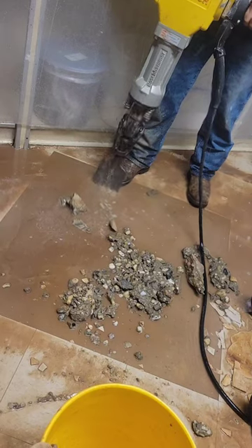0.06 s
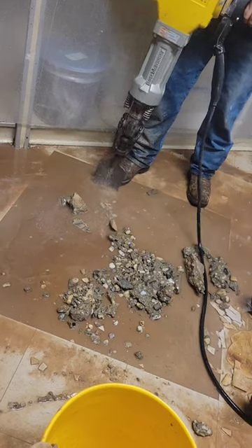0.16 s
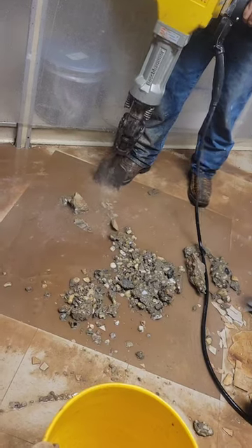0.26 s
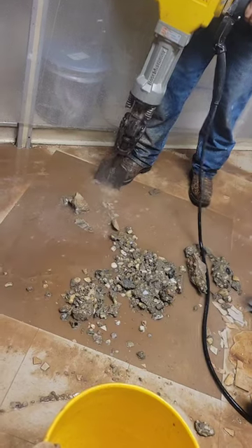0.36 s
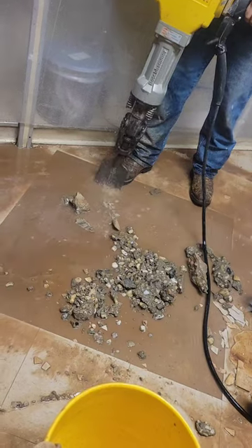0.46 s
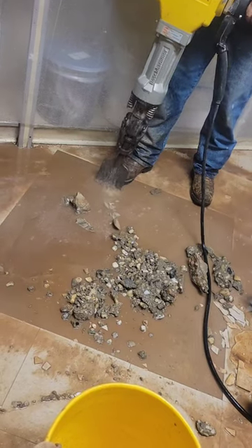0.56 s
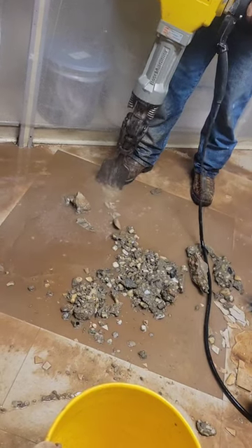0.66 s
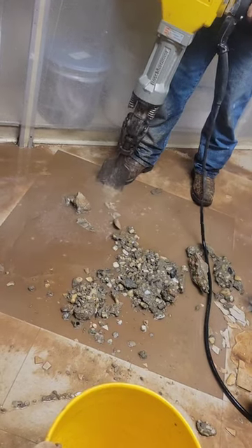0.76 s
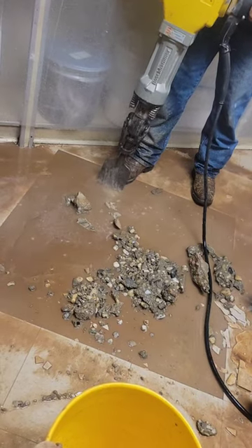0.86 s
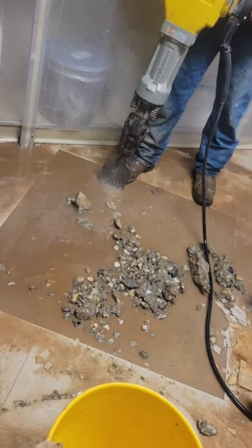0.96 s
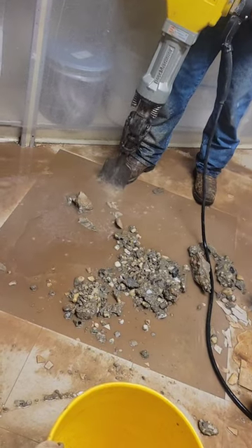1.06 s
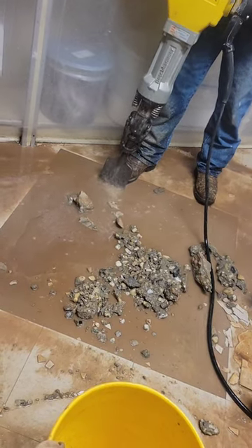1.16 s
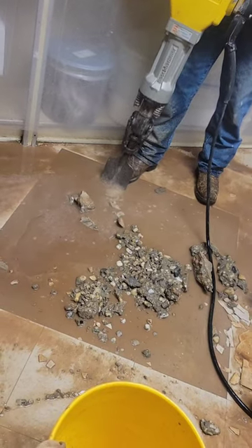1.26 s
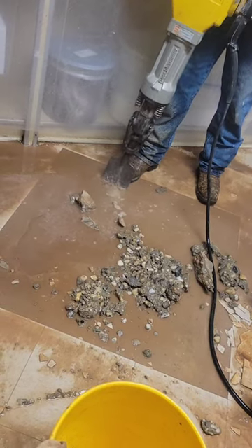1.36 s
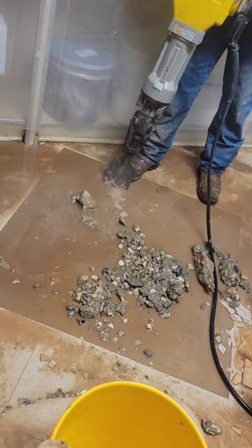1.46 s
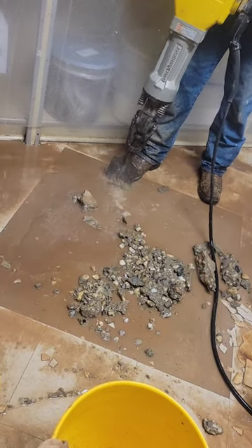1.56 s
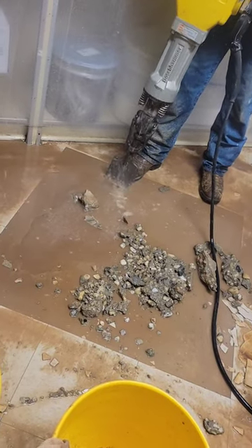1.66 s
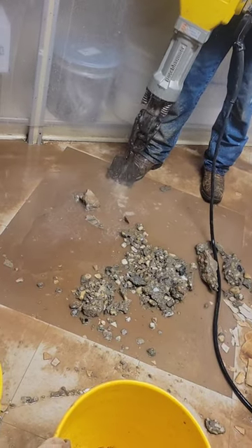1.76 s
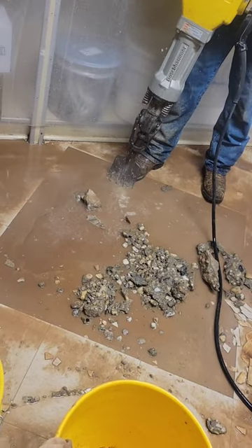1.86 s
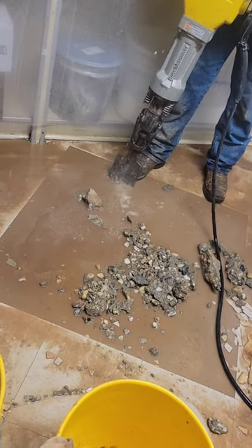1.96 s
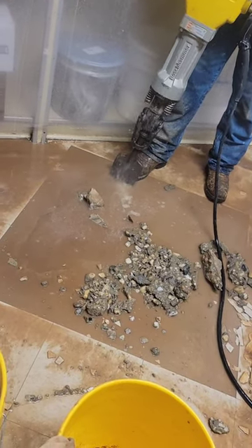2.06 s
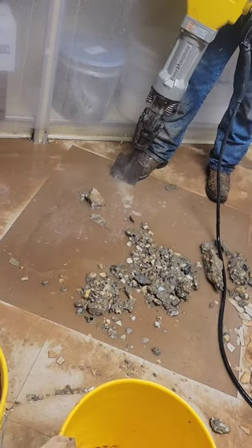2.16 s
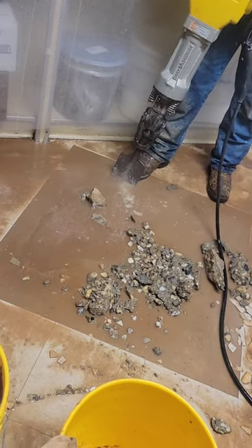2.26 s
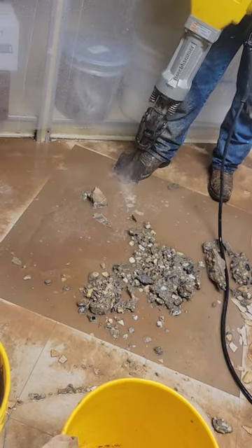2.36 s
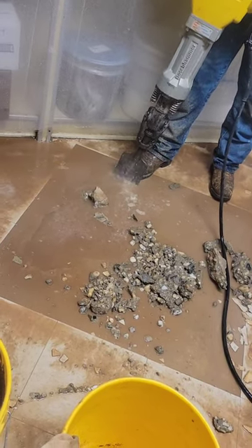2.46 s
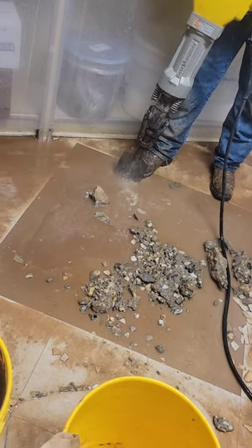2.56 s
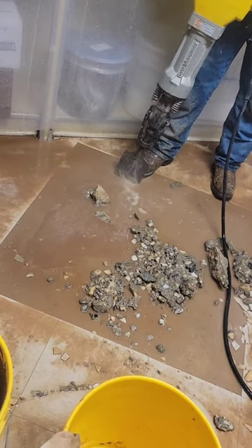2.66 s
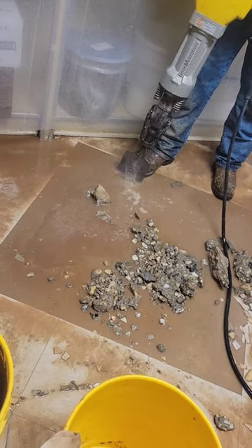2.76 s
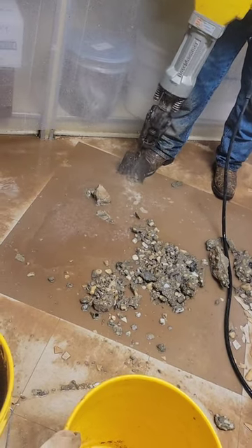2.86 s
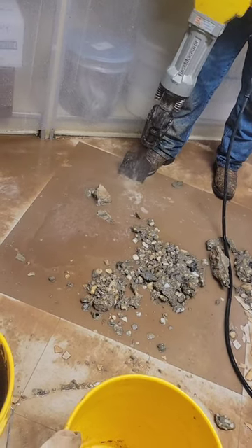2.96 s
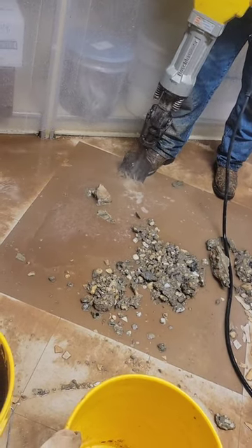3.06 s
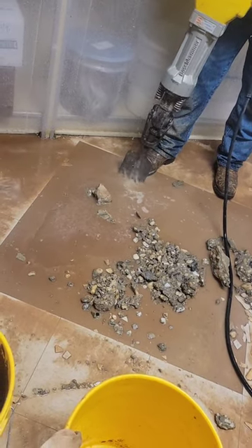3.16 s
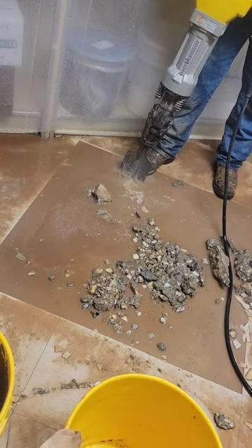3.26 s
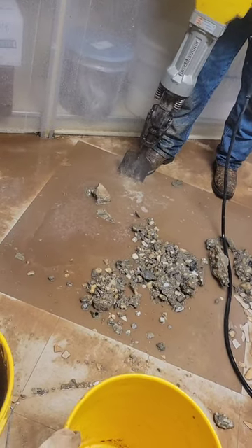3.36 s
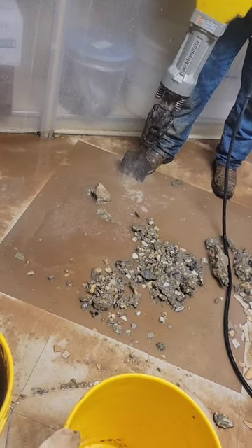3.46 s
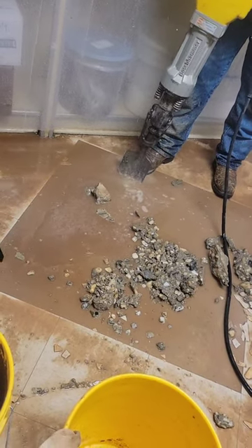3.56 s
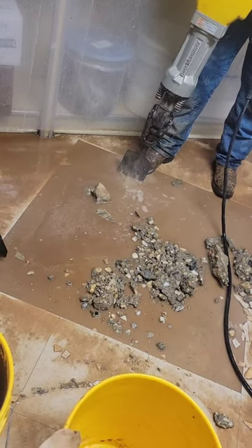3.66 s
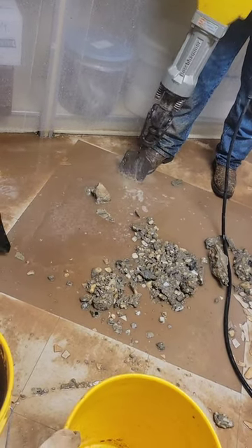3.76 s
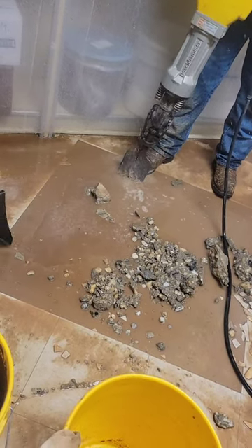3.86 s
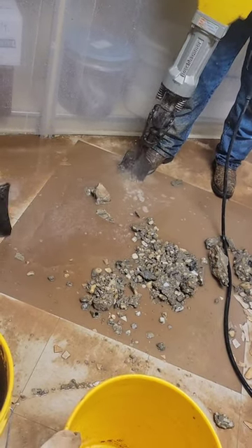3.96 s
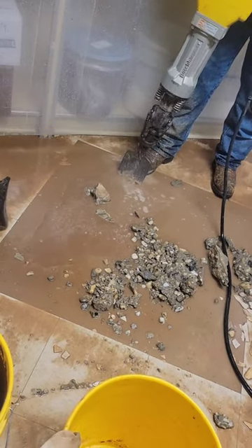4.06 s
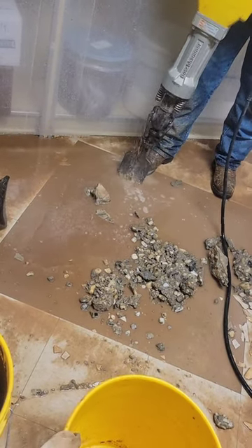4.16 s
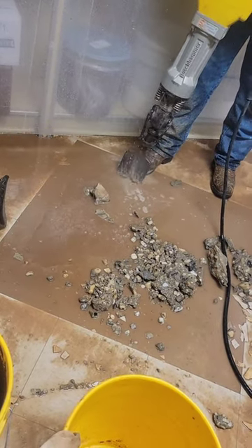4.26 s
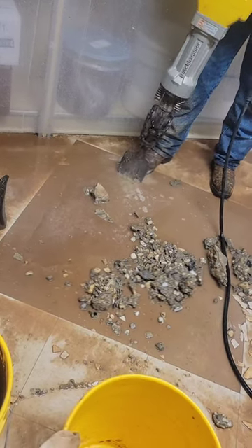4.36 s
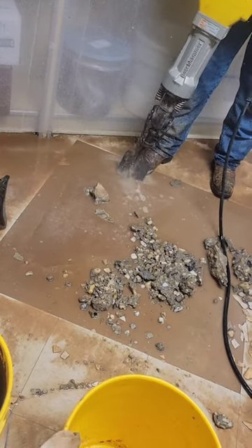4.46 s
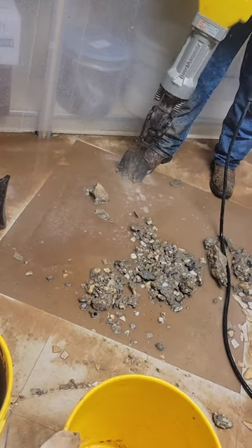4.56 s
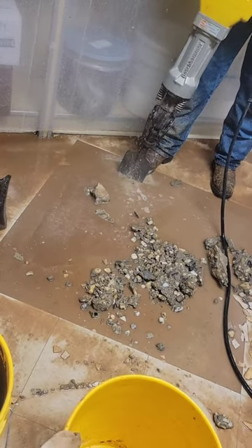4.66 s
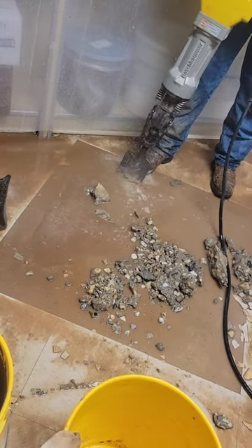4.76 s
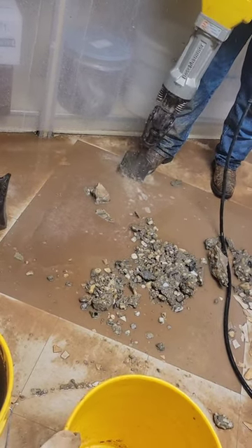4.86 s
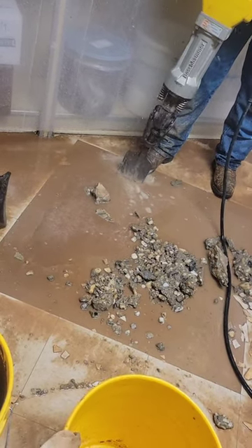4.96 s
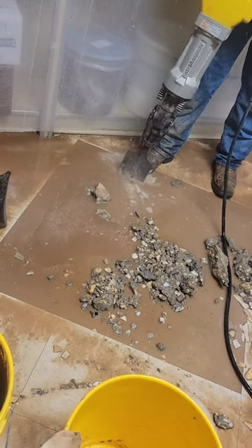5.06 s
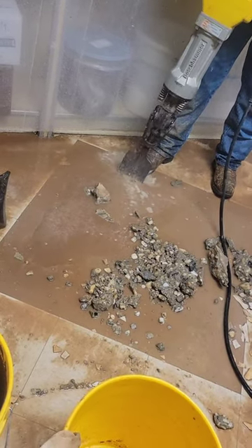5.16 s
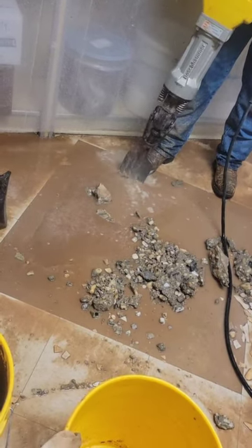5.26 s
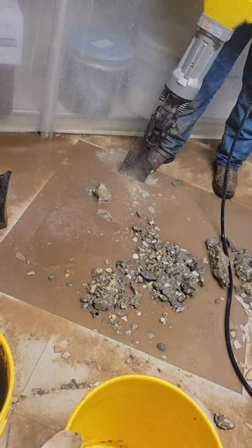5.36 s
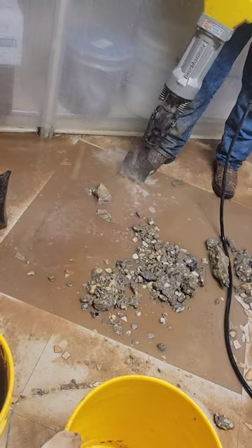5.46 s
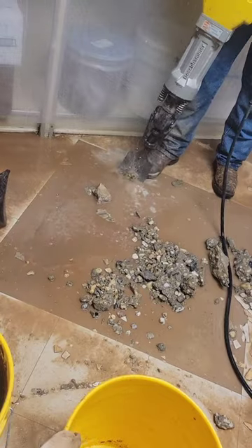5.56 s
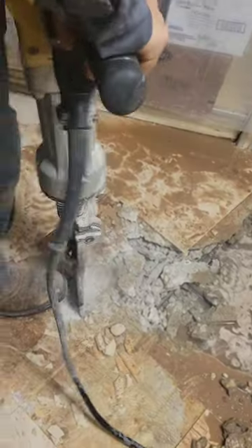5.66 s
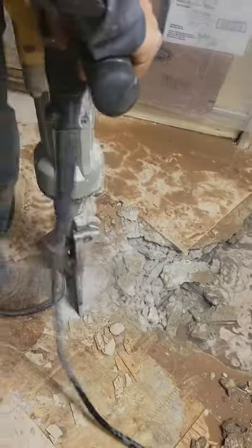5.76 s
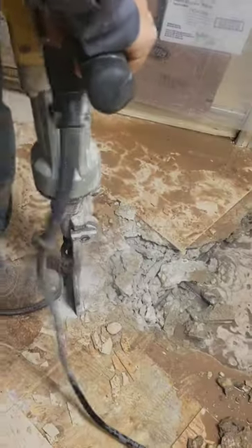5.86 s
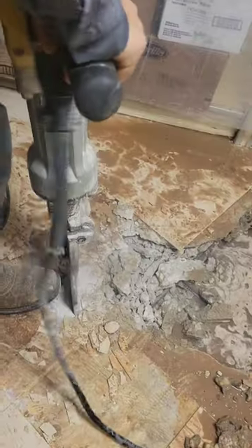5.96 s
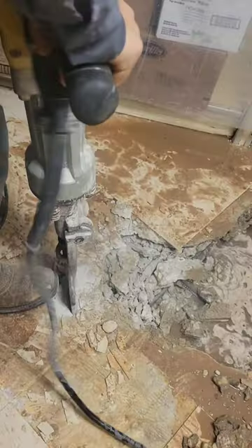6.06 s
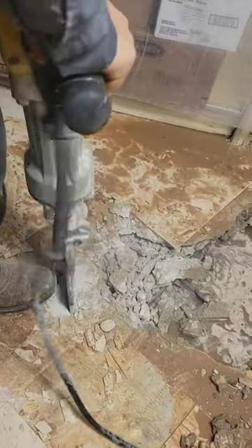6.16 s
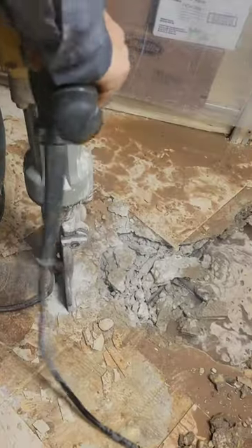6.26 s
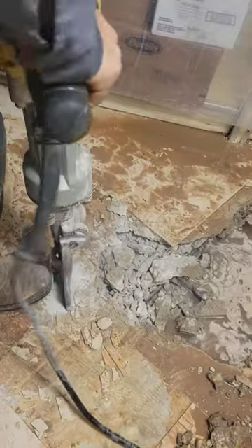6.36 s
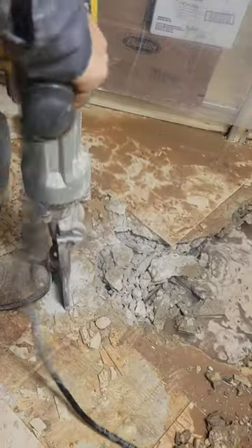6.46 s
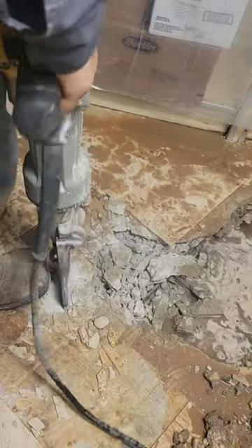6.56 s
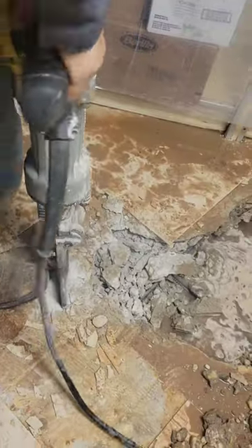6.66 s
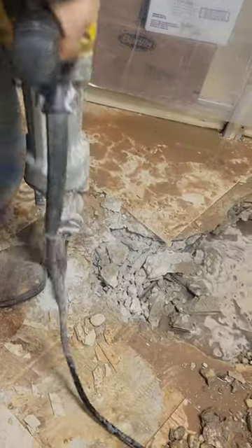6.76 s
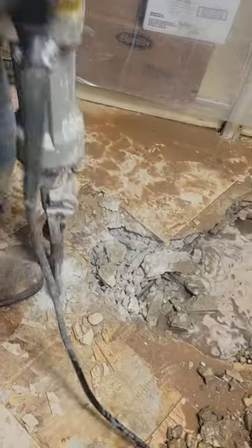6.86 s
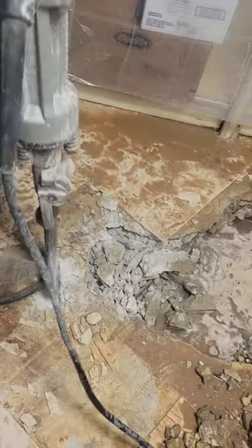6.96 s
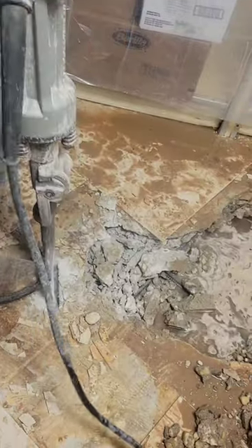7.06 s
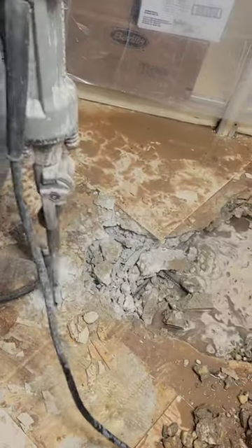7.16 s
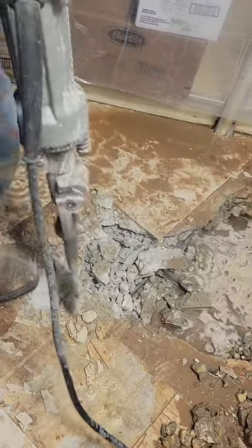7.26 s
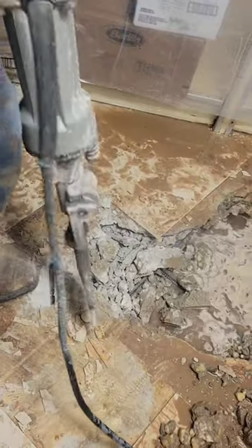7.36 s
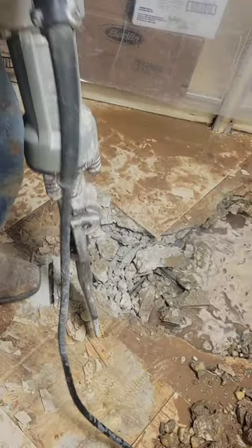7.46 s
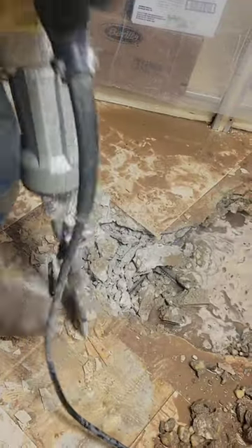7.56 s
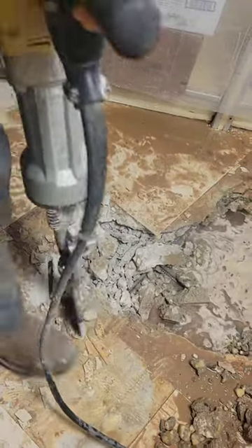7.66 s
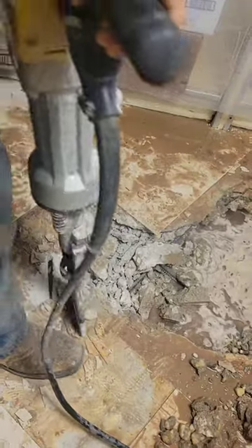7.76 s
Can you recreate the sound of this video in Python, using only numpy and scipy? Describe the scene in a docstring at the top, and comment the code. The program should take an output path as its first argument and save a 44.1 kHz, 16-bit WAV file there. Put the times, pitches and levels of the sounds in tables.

```python
"""An electric demolition hammer is pounding a concrete floor in a small hard room, over a faint rush of air.
Every blow thuds through the floor, crushes concrete with a bright crack and sets the steel chisel ringing.
After a brief silence it is at a second spot, over a low hum, where the drive squeaks and runs down.
The lifted chisel rings on, clinks and scrapes lightly over the fragments,
then knocks down on the floor and is shoved through the rubble."""
import sys
import numpy as np
from scipy import signal
from scipy.fft import rfft, irfft
from scipy.io import wavfile

SR = 44100
rng = np.random.default_rng(int(sys.argv[2]) if len(sys.argv) > 2 else 0)


def transcribe(signal):
    """Save signal, clipped to [-1, 1], as a 16-bit WAV file at the path in sys.argv[1]."""
    frames = np.atleast_2d(signal).T
    limited = np.clip(frames, -1, 1)
    pcm = np.round(limited * 32767).astype(np.int16)
    wavfile.write(sys.argv[1], SR, pcm)


N = 345303
TIME = np.arange(N) / SR
AGE = np.arange(16384) / SR   # seconds into a single hit
SECOND_SPOT_S, SET_DOWN_S = 5.8, 7.609

# The first crack of steel on stone. Each row: frequency in Hz, noise density in dB.
CRACK_SPECTRUM = [(100, -56), (600, -52), (2000, -61.5), (3500, -67), (5700, -47.5), (7500, -59),
                  (15000, -71)]
# The chisel's modes. Each row: pitch in Hz, then level in dB at the first spot, at the second spot,
# once sunk in there and when lifted, then left over right in dB.
CHISEL_MODES = [(1499.2, -33, -39, -34, -55, -1.5), (2872, -34, -42, -42, -39, 6),
                (2986, -38.5, -36, -33, -28, -1.5), (3139, -30, -41, -36.5, -24.5, 2.5),
                (4144, -32, -49, -45, -15.5, 0.5), (4755, -29, -34, -28.5, -47, -11),
                (4850, -25.5, -42, -36, -21, 1), (5527, -30, -19, -26.5, -18, -10.5),
                (5670, -38, -25.5, -31, -40, 10), (5974, -27, -45, -45, -18, -3.5),
                (6980, -38, -42, -42, -48, 0.5), (7150, -35, -38, -34, -25, 14.5),
                (7990, -35.5, -38, -20, -42, 1.5), (9450, -39, -50, -48, -33, 8),
                (11540, -30, -20.5, -28, -33, 4.5), (11640, -35, -31, -33, -45, 5),
                (11890, -28.5, -48, -40, -35, -2.5), (14630, -26.5, -35, -36, -26, -3),
                (15520, -41, -48, -48, -48, 2)]


def from_db(db):
    return 10 ** (np.asarray(db) / 20)


def unit_rms(x):
    return x / np.sqrt(np.mean(x ** 2) + 1e-20)


def at_hz(points, hz):
    """Read a curve along a logarithmic frequency axis."""
    knots, values = np.transpose(points)
    return np.interp(np.log(hz + 1), np.log(knots), values)


def pan(left_over_right_db):
    return from_db(np.array([[.5], [-.5]]) * left_over_right_db)


def butter(x, order, hz, kind="low"):
    return signal.sosfilt(signal.butter(order, hz, kind, fs=SR, output="sos"), x)


def add(out, s, sound):
    """Mix a sound in from time s on."""
    start = max(round(s * SR), 0)
    out[..., start:start + sound.shape[-1]] += sound[..., :N - start]


def ring(drive, hz, t60):
    """One resonance: a unit click sets a sine of height 1 ringing."""
    radius, angle = from_db(-60 / (t60 * SR)), 2 * np.pi * hz / SR
    return signal.lfilter([0, np.sin(angle)], [1, -2 * radius * np.cos(angle), radius ** 2], drive + 1e-18)


def room_noise(spectrum, size, count=1):
    """A stack of stereo noises with the given spectrum, spread as the room spreads them."""
    # Stereo width. Each row: frequency in Hz, likeness of left and right (1 or more is fully alike).
    likeness = [(60, 0.07), (200, 1.3), (350, 0.24), (640, -0.14), (1400, -0.35), (3000, 0.06),
                (6000, -0.21), (15000, 0)]
    # Stereo lean. Each row: frequency in Hz, left over right in dB.
    balance = [(300, 2), (600, -4.5), (1400, -2), (2500, 0.5), (4400, -2.5), (6000, -4), (7500, -0.5),
               (11000, 5), (12500, -1), (15000, 5.5)]
    hz = np.arange(size // 2 + 1) * SR / size
    mid, side = rfft(rng.standard_normal((2, count, 1, size)))
    alike = np.clip(at_hz(likeness, hz), -1, 1)
    stereo = np.sqrt((1 + alike) / 2) * mid + np.sqrt((1 - alike) / 2) * side * [[1], [-1]]
    return irfft(stereo * from_db(at_hz(spectrum, hz)) * pan(at_hz(balance, hz)), size) * np.sqrt(SR / 2)


def linger(hold_s, t60, rise_s):
    """A blow's level holds for a moment, then dies away."""
    return (1 - np.exp(-AGE / rise_s)) / np.sqrt(1 + from_db(120 * (AGE - hold_s) / t60))


def grit(per_s, spread_db):
    """Gain that jumps from fragment to fragment."""
    knots = np.cumsum(rng.exponential(1 / per_s, 20000))
    jumps = np.clip(rng.standard_normal(len(knots)), -2, 2)
    return unit_rms(from_db(spread_db * np.interp(TIME, knots, jumps)))


def long_run(start_s, end_s):
    """One blow per turn of the crank. Each row: seconds, then thud, crunch, lower and upper ring in dB."""
    # The motor sags a little halfway. Each row: time in seconds, blows per second.
    blow_rate = [(2.9, 14.15), (3.0, 14.105)]
    # How the tool bears on the floor. Each row: time in seconds, then level in dB of the thud,
    # the crunch, the chisel's lower modes and its upper modes.
    bearing = [(.2, -5.5, 5.5, 2, 2.5), (.8, -3.5, 2, -1.5, 2), (1.5, -4.5, 3, 0, -2.5),
               (2.3, -2.5, 2.4, -0.5, 1), (3.7, -3.5, 2.4, -1, 2), (4.2, -3, 4, -2.5, 1.5),
               (5.65, -3.5, 3, -2, 0.5)]
    working = TIME[(TIME >= start_s) & (TIME < end_s)]
    turns = np.cumsum(np.interp(working, *np.transpose(blow_rate))) / SR
    starts = np.interp(np.arange(int(turns[-1]) + 1), turns, working)
    knots, *curves = np.transpose(bearing)
    levels = np.transpose([np.interp(starts, knots, db) for db in curves])
    luck = np.clip(rng.standard_normal((len(starts) + 1, 4)), -2, 2)
    slip_s = .0006 * luck[1:, 0]   # the striker lands a little early or late
    # after a hard bounce the chisel tends to sit badly for the next blow
    rebound_share, scatter_db = 0.47, [0, 0.73, 1.2, 2]
    scatter = (luck[1:] - rebound_share * luck[:-1]) * scatter_db
    return np.column_stack([starts + slip_s, levels + scatter])


def thud(blows, jolts, modes, level_db, uneven_db, right_lag_s):
    """Blow and recoil shake the floor in nearly the same way on every stroke."""
    clicks = np.zeros(N)
    for (s, thud_db, *_), lucks in zip(blows, rng.standard_normal((len(blows), len(jolts)))):
        for (delay, db), luck in zip(jolts, lucks):
            add(clicks, s + delay, from_db([thud_db + db + uneven_db * luck]))
    boom = sum((-1) ** k * from_db(db) * ring(clicks, hz, t60) for k, (hz, db, t60) in enumerate(modes))
    return from_db(level_db) * np.array([boom, np.interp(TIME - right_lag_s, TIME, boom)])


def fragment_colour(bursts, ripple_db, width_hz):
    """Every fragment that breaks off stresses other pitches."""
    hz = np.arange(len(AGE) // 2 + 1) * SR / len(AGE)
    knots = np.arange(0, SR / 2, width_hz)
    ripples = np.clip(rng.standard_normal((len(knots), len(bursts))), -2, 2).T
    gains = np.array([unit_rms(from_db(ripple_db * np.interp(hz, knots, row))) for row in ripples])
    return irfft(rfft(bursts) * gains[:, None], len(AGE))


def crunch(blows, spectrum, envelope, crossover_hz, grit_db):
    """The casing's low clatter repeats on every blow; the crushed concrete above it is new each time."""
    same, *fresh = room_noise(spectrum, size=len(AGE), count=len(blows) + 1)
    fresh = fragment_colour(np.array(fresh), ripple_db=4.0, width_hz=70)
    clatter = butter(same, 1, crossover_hz)
    crushes = butter(fresh, 1, crossover_hz, "high")
    out = np.zeros((2, N))
    for (s, _, db, *_), crush in zip(blows, crushes):
        add(out, s, from_db(db - np.median(blows[:, 2])) * envelope * (clatter + crush))
    return out * grit(per_s=900, spread_db=grit_db)


def crack(blows, level_db, t60):
    """The tip meets stone with a short bright crack that follows the level of the lower ring."""
    bursts = room_noise(CRACK_SPECTRUM, size=len(AGE), count=len(blows))
    out = np.zeros((2, N))
    for (s, _, _, lower_db, _), burst in zip(blows, bursts):
        add(out, s, burst * from_db(level_db + lower_db - 60 * AGE / t60))
    return out


def chisel(blows, t60, uneven_db, lower_db, upper_db, strike_gain):
    """Each blow strikes the steel, which then chatters in its holder; the modes share it out unevenly."""
    sunk_s, lifted_s, upper_from_hz = 6.4, 6.9, 7500
    stance = np.searchsorted([SECOND_SPOT_S, sunk_s, lifted_s], blows[:, 0])
    lower = linger(hold_s=0.023, t60=0.23, rise_s=0.00018), blows[:, 3] + lower_db
    upper = linger(hold_s=0.038, t60=0.22, rise_s=0.0014), blows[:, 4] + upper_db
    build_up = np.sqrt(t60 * SR / np.log(1000)) / 2   # a mode's gain under steady chatter
    out = np.zeros((2, N))
    for hz, *stance_db, pan_db in CHISEL_MODES:
        envelope, force_db = upper if hz > upper_from_hz else lower
        luck = np.minimum(rng.exponential(1, len(blows)), 3.5) - 1
        strengths = from_db(force_db + np.array(stance_db)[stance] + uneven_db * luck)
        polarities = rng.choice([-1, 1], (len(blows), 2, 1))
        power, clicks = np.zeros(N), np.zeros((2, N))
        for s, strength, polarity in zip(blows[:, 0], strengths, polarities):
            add(power, s, (strength * envelope) ** 2)
            add(clicks, s, strike_gain * strength * polarity)
        chatter = np.sqrt(power) * rng.standard_normal((2, N)) / build_up
        out += pan(pan_db) * ring(clicks + chatter, hz, t60)
    return out


def room_tone(air_db, hum_db, hum_hz):
    """A steady rush of air lies under the work; a low hum joins it at the second spot."""
    # The dull rush of air. Each row: frequency in Hz, noise density in dB.
    air_spectrum = [(25, -68), (60, -57.5), (120, -62.5), (330, -69), (850, -72), (2350, -69),
                    (3000, -72.5), (5500, -71.5), (9500, -97), (15000, -93.5)]
    hum = np.sqrt(2) * from_db(hum_db) * np.sin(2 * np.pi * hum_hz * TIME) * (TIME > SECOND_SPOT_S)
    return hum + from_db(air_db) * room_noise(air_spectrum, size=N)[0]


def squeaks(blows, level_db, top_hz, fall_hz, length_s):
    """The drive squeaks just before a blow, falling in pitch as the compression stroke loads the motor."""
    stroke = np.minimum(AGE / length_s, 1)
    out = np.zeros((2, N))
    for s, (detune, *phases) in zip(blows[:, 0], rng.standard_normal((len(blows), 3))):
        hz = (top_hz - fall_hz * stroke) * (1 + 0.0095 * detune)
        tone = np.sin(2 * np.pi * (np.cumsum(hz) / SR + np.array(phases)[:, None]))
        add(out, s - length_s, from_db(level_db) * np.sin(np.pi * stroke) * tone)
    return out


def after_ring(s, level_db, t60):
    """Free of the floor, the chisel's highest modes sing on."""
    # Modes that outlast the last blow. Each row: pitch in Hz, level in dB.
    free_modes = [(10300, 0), (15540, 5)]
    out = np.zeros((2, N))
    for hz, db in free_modes:
        tone = np.sin(2 * np.pi * (hz * TIME + rng.random((2, 1))))
        add(out, s, tone * from_db(level_db + db - 60 * TIME / t60))
    return out


def drag_level():
    """Light scrapes swell, hold and die away; once down, the chisel is shoved under the tool's weight."""
    # The tip brushing the rubble. Each row: start of the hold in seconds, level in dB, hold in seconds.
    scrapes = [(7.04, -30, .03), (7.117, -31, 0.018), (7.189, -29.5, 0.018), (7.295, -29.5, 0.052),
               (7.42, -33, 0.037)]
    level = np.zeros(N)
    for s, db, hold in scrapes:
        before, after = np.maximum(s - TIME, 0), np.maximum(TIME - s - hold, 0)
        level += from_db(db - 600 * before - 350 * after)   # slopes in dB per second
    shove_peak_s = 7.702
    shove_db = -9 - np.maximum(146 * (shove_peak_s - TIME), 212 * (TIME - shove_peak_s))
    return level + from_db(shove_db) * (TIME > SET_DOWN_S)


def rubble(knock_db, knock_t60, heavy_db, scratch_hz):
    """The loose chisel scratches over the fragments, knocks down on the floor and grinds through them."""
    # Grinding rubble. Each row: frequency in Hz, noise density in dB.
    grind_spectrum = [(35, -50), (60, -29), (118, -6), (294, -8.5), (540, -13), (842, -14), (968, -20),
                      (1220, -12.5), (1550, -20.5), (4220, -15.5), (7230, -21.5), (8510, -36), (16000, -33)]
    level = drag_level() * grit(per_s=300, spread_db=0.5)
    add(level, SET_DOWN_S, from_db(knock_db - 60 * AGE / knock_t60))
    grind = unit_rms(room_noise(grind_spectrum, size=N)[0])
    scratch = butter(grind, 2, scratch_hz, "band")
    # a light touch only scratches; the tool's full weight brings in the whole grinding sound
    weight = np.minimum(level / from_db(heavy_db), 1)
    return level * (weight * grind + (1 - weight) * scratch)


def clink(s, hz, chatter_db, chatter_t60):
    """The loose chisel chatters briefly and clinks on a single note."""
    chatter = np.zeros((2, N))
    add(chatter, s, rng.standard_normal((2, len(AGE))) * from_db(chatter_db - 60 * AGE / chatter_t60))
    return ring(chatter, hz, t60=0.043)


def scraped_steel(rub_db, t60, lowpass_hz):
    """Rubbing over stone, the chisel sings faintly, its highest modes softened."""
    pressure = from_db(rub_db) * drag_level() * grit(per_s=200, spread_db=1.0)
    rub = butter(pressure * rng.standard_normal((2, N)), 1, lowpass_hz)
    return sum(from_db(db) * pan(pan_db) * ring(rub, hz, t60) for hz, db, *_, pan_db in CHISEL_MODES)


def landing_tick(t60):
    """Steel touches stone as the chisel lands."""
    out = np.zeros((2, N))
    add(out, SET_DOWN_S, room_noise(CRACK_SPECTRUM, size=len(AGE))[0] * from_db(-60 * AGE / t60))
    return out


def fades(first_in_s, first_out_s, second_in_s, second_db):
    """Gain that opens on each spot, with silence before and between."""
    fade_in_s, fade_out_s = 0.044, 0.038
    first = np.clip(np.minimum((TIME - first_in_s) / fade_in_s, (first_out_s - TIME) / fade_out_s), 0, 1)
    second = np.clip((TIME - second_in_s) / fade_in_s, 0, 1)
    return first ** 2 + from_db(second_db) * second ** 2


def scene():
    """Both spots, with the work already under way when each fades in."""
    # Blow and recoil within one stroke, at each spot. Each row: delay in seconds, level in dB.
    first_jolts = [(.0013, -0.5), (.0073, -7.5), (.0148, -23), (0.03, 3), (.0412, -2.5)]
    second_jolts = [(.0001, -4.5), (.0069, -8.5), (0.0216, -4)]
    # The boom of floor and room. Each row: pitch in Hz, level in dB, seconds to fall by 60 dB.
    first_boom = [(58.7, -21, 0.13), (75, -19, 0.064), (95.5, -27.5, 0.29), (154.8, -24, 0.37),
                  (239, -30.5, 0.51), (284.3, -30, 0.27), (314.6, -19.5, 0.14), (355.6, -24.5, 0.23),
                  (367, -34, 0.066)]
    second_boom = [(77.6, -25, 0.3), (109, -16, 0.34), (154, -23, 0.19), (187.5, -21, 0.17),
                   (227, -12, 0.21), (296, -16.5, 0.25), (357, -19, 0.17)]
    # Crushed concrete. Each row: frequency in Hz, noise density in dB.
    first_crunch = [(28, -81.5), (55, -48), (200, -55), (350, -41), (550, -47.5), (1000, -50),
                    (1450, -51.5), (2100, -58), (3700, -58.5), (5600, -53.5), (7000, -61), (8600, -67.5),
                    (10900, -61.5), (12400, -56.5), (15500, -62)]
    second_crunch = [(30, -71.5), (90, -47.5), (280, -46.5), (500, -50), (1200, -49), (2000, -55.5),
                     (3100, -49), (4200, -50.5), (5900, -43), (7200, -55.5), (8600, -67), (10800, -61),
                     (12400, -52), (15500, -54.5)]
    # The blows as the hammer runs down at the second spot. Each row: start in seconds, then level in dB
    # of the thud, the crunch, the chisel's lower modes and its upper modes.
    run_down = [(5.812, -1, -2.5, 8, 5), (5.881, 2, -1, -1.5, 6), (5.95, 1, -.5, 2, 5),
                (6.019, 1.5, -2.5, 2, 2), (6.091, 2.5, -5, 2, 6), (6.156, 3, -3.5, -0.5, -5),
                (6.226, 5.5, -5, 1, -4), (6.293, 6, -2.5, 3.5, 5), (6.361, 6, -5, 3.5, -4),
                (6.431, 2, 0.5, 1.5, 7), (6.501, 4, -1, 4.5, 5), (6.57, 4, 0, 4, 10.5),
                (6.637, 1.5, -5, 4.5, -4), (6.715, 0, -3.5, 5, 3), (6.806, -1.5, -6, 3.5, -6),
                (6.925, -25, -7, -2.5, 6.5)]
    first_out_s = 5.703
    first, second = long_run(start_s=0.1318, end_s=first_out_s), np.array(run_down)
    out = thud(first, first_jolts, first_boom, level_db=-0.9, uneven_db=1.5, right_lag_s=0.00044)
    out += thud(second, second_jolts, second_boom, level_db=0.2, uneven_db=4.0, right_lag_s=0.0001)
    out += crunch(first, first_crunch, linger(hold_s=0.033, t60=0.21, rise_s=0.00086),
                  crossover_hz=740, grit_db=1.34)
    out += crunch(second, second_crunch, linger(hold_s=0.031, t60=0.23, rise_s=0.00017),
                  crossover_hz=407, grit_db=0.5)
    out += crack(first, level_db=0.1, t60=0.053) + crack(second, level_db=6.5, t60=0.11)
    out += chisel(np.vstack([first, second]), t60=0.088, uneven_db=2.5,
                  lower_db=2.5, upper_db=0.04, strike_gain=1.254)
    out += squeaks(second[2:-3], level_db=-18, top_hz=3840, fall_hz=424, length_s=0.021)
    out += after_ring(second[-1, 0], level_db=-33, t60=1.1)
    out += landing_tick(t60=0.018)
    out += thud([(SET_DOWN_S, 0)], [(0.0021, 0)], second_boom, level_db=-4.5, uneven_db=0, right_lag_s=0)
    out += rubble(knock_db=-16, knock_t60=0.17, heavy_db=-30, scratch_hz=[1600, 6400])
    out += clink(s=7.025, hz=2430, chatter_db=-43, chatter_t60=0.45)
    out += room_tone(air_db=1.0, hum_db=-33, hum_hz=59.2)
    out += scraped_steel(rub_db=-5.5, t60=0.066, lowpass_hz=3500)
    return out * fades(first_in_s=0.176, first_out_s=first_out_s, second_in_s=5.847, second_db=-8.5)


def record(dry):
    """Shed the deepest bass, round off the peaks and cut the very top."""
    low_cut_hz, high_cut_hz = 34, 15800
    rounded = np.tanh(butter(dry, 2, low_cut_hz, "high"))
    return signal.sosfilt(signal.ellip(10, .2, 80, high_cut_hz, fs=SR, output="sos"), rounded)


dry = scene()
out = record(dry)
transcribe(out)
```